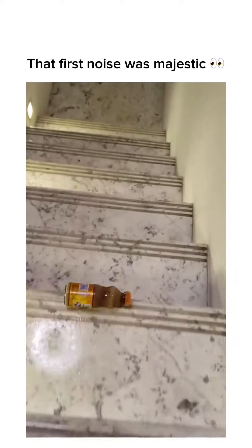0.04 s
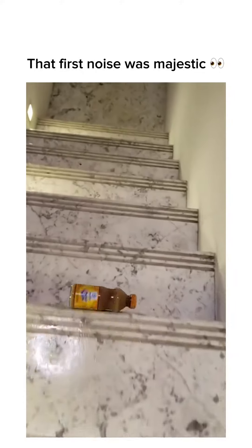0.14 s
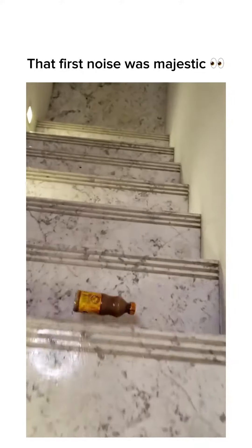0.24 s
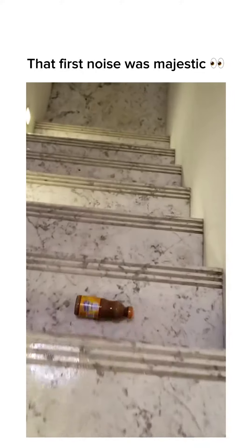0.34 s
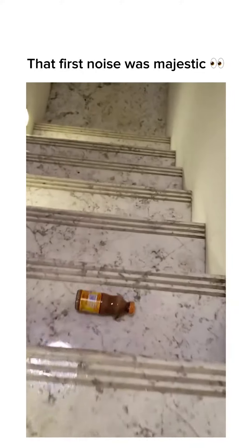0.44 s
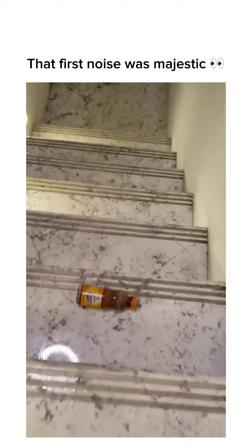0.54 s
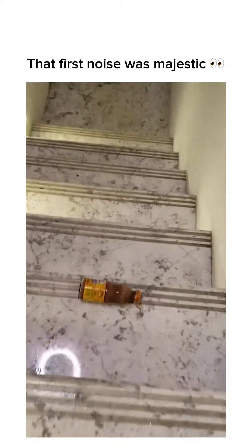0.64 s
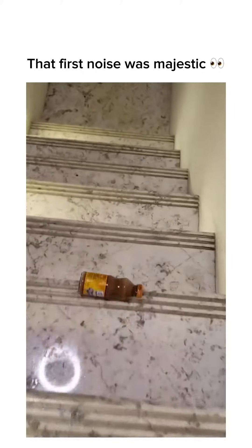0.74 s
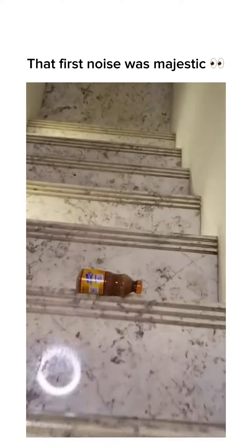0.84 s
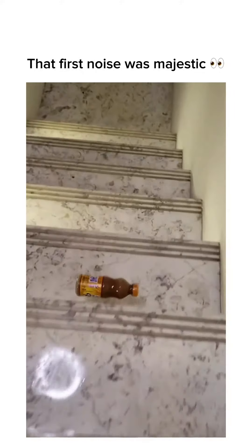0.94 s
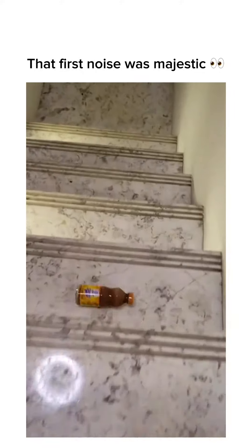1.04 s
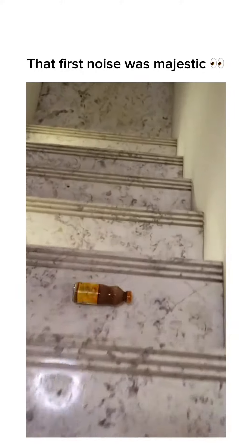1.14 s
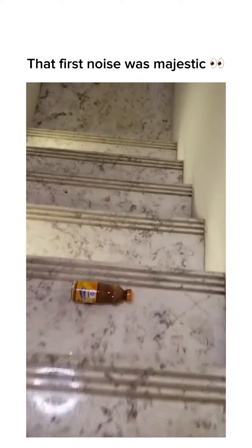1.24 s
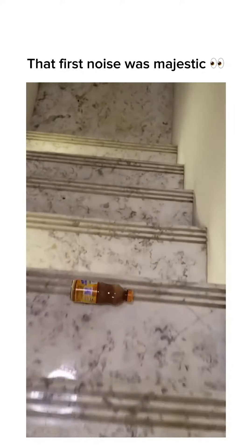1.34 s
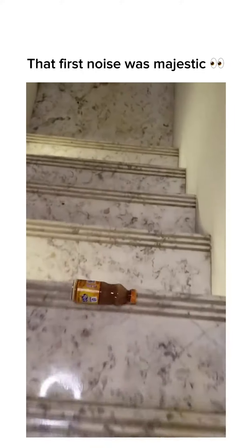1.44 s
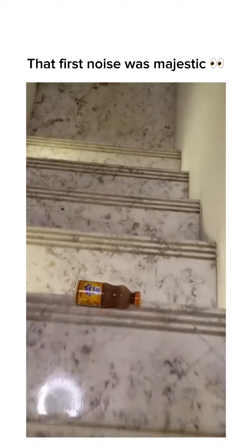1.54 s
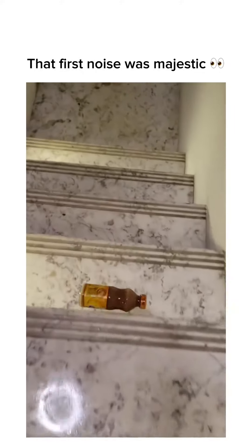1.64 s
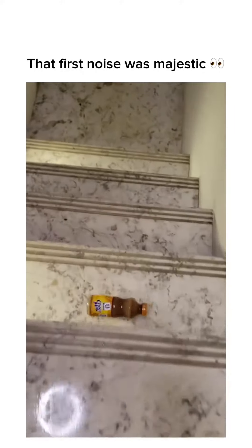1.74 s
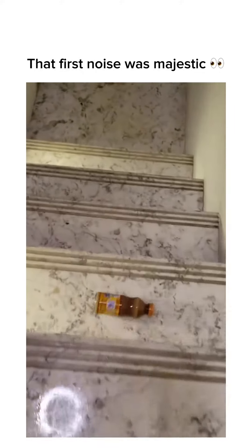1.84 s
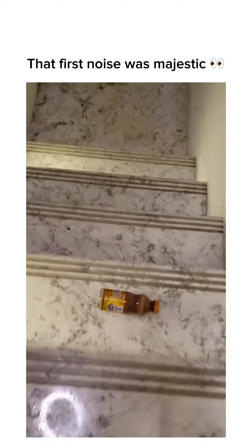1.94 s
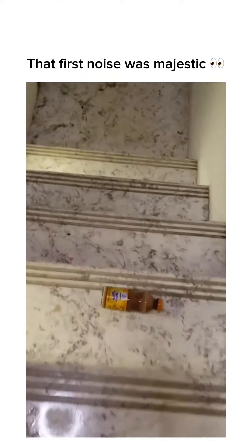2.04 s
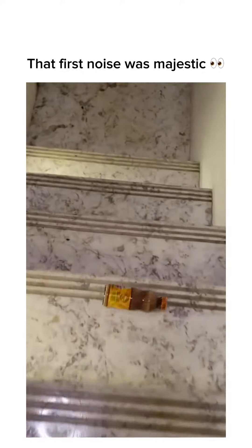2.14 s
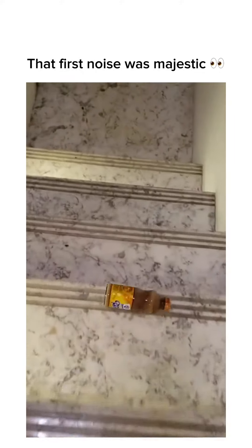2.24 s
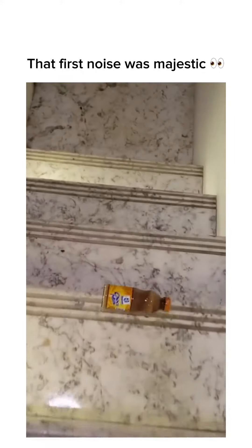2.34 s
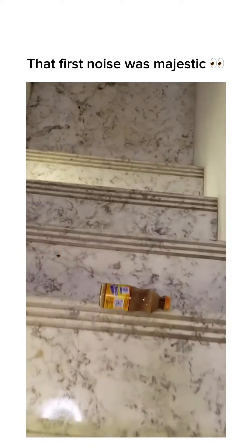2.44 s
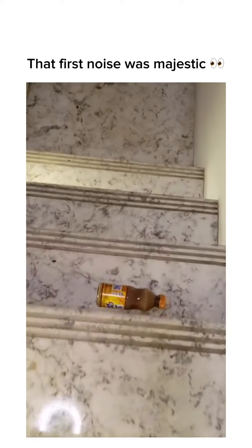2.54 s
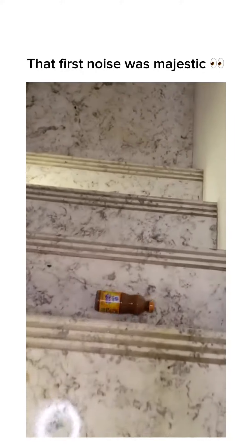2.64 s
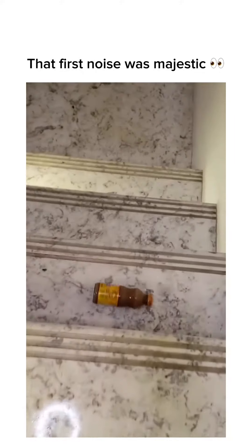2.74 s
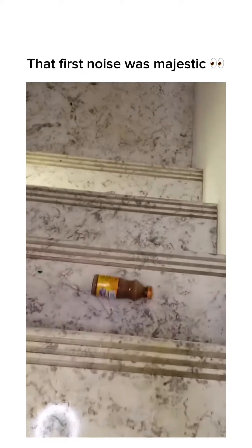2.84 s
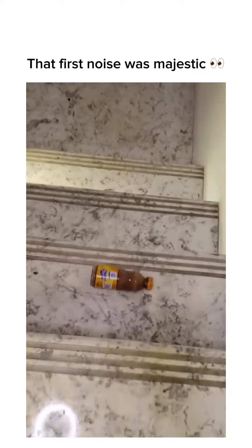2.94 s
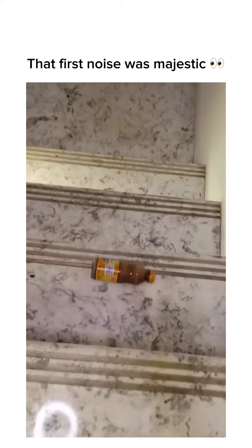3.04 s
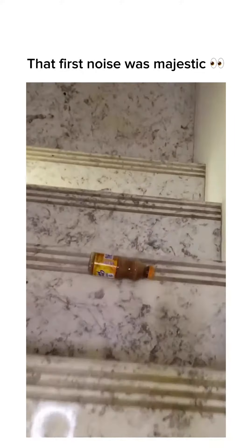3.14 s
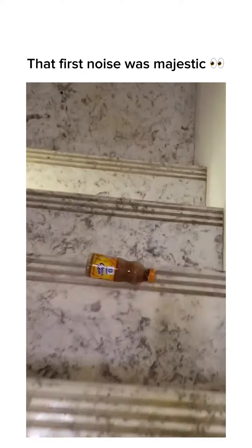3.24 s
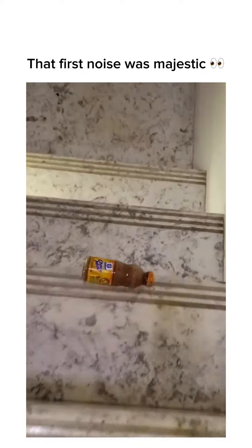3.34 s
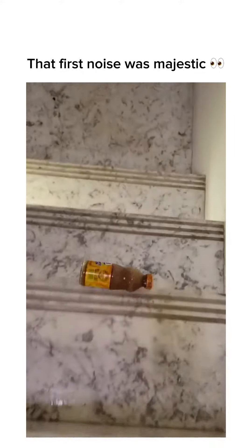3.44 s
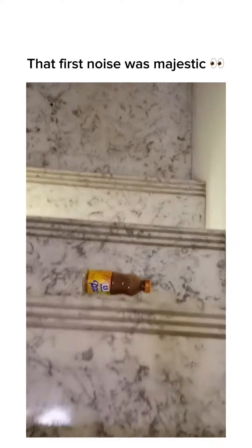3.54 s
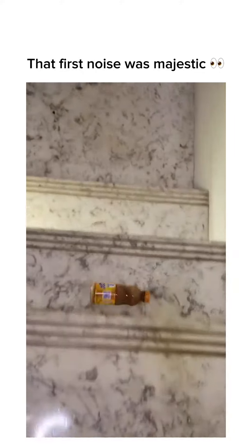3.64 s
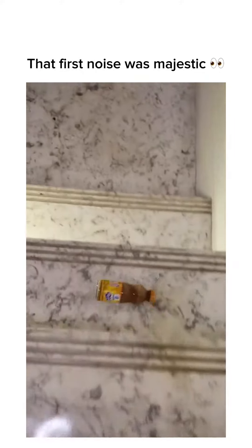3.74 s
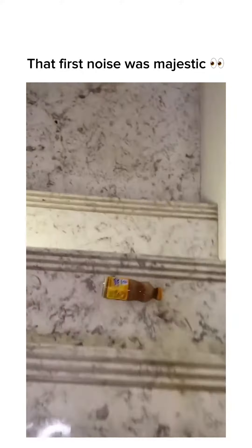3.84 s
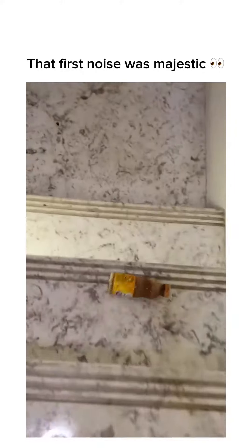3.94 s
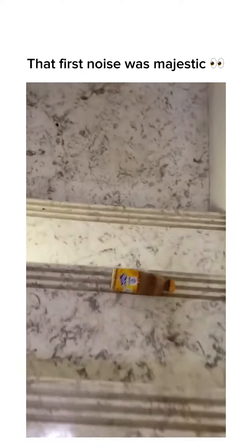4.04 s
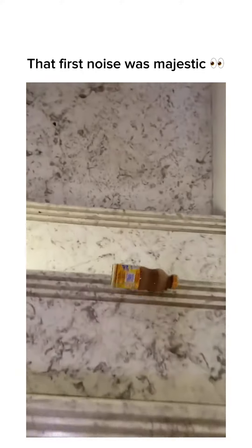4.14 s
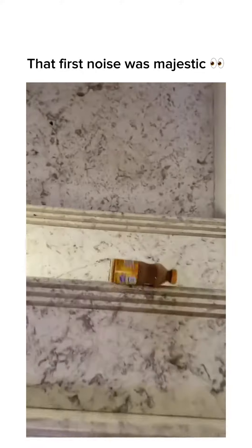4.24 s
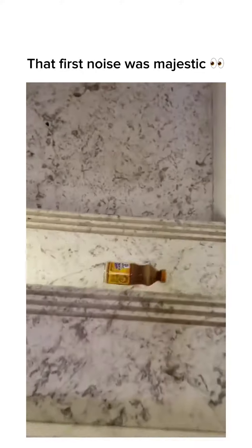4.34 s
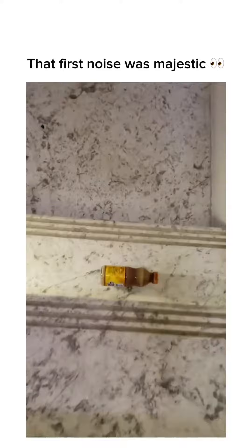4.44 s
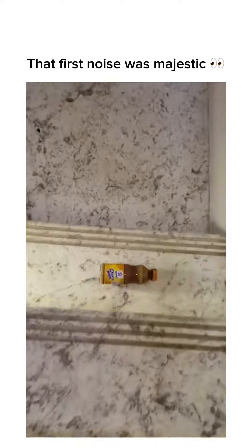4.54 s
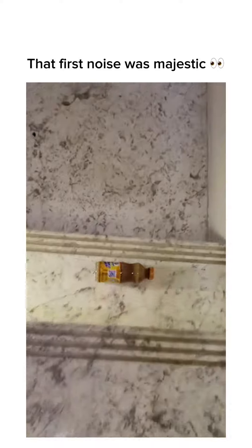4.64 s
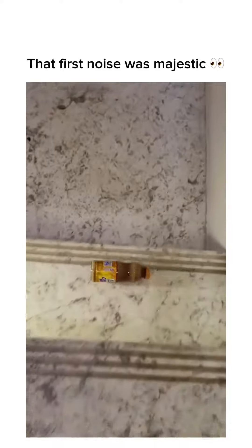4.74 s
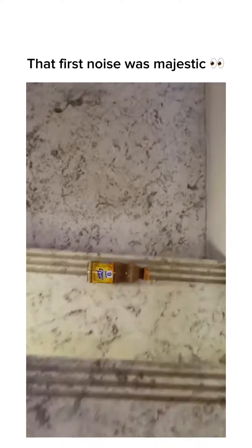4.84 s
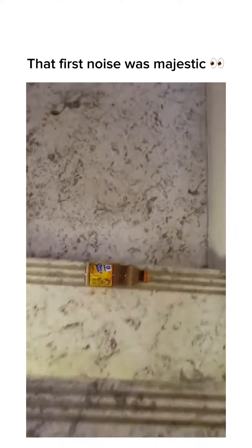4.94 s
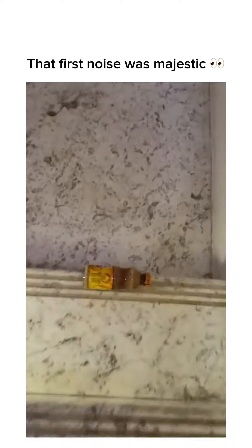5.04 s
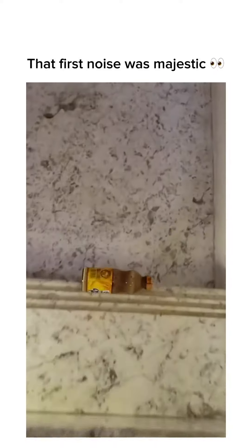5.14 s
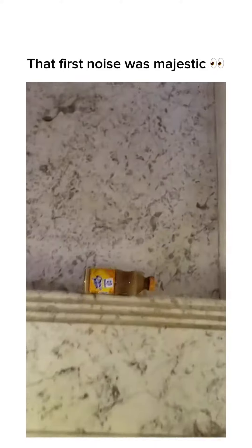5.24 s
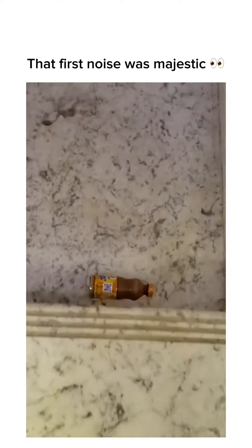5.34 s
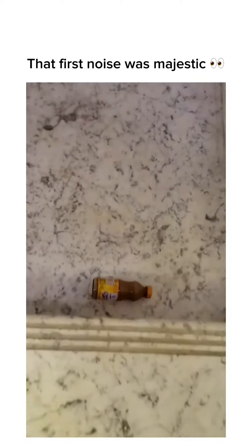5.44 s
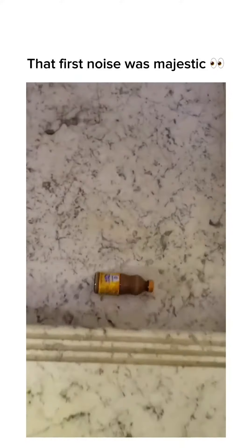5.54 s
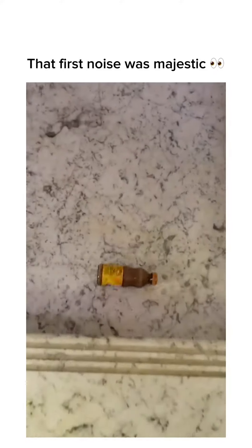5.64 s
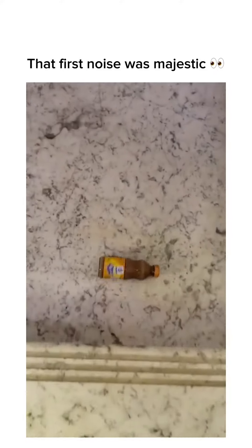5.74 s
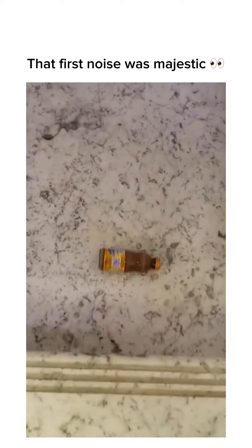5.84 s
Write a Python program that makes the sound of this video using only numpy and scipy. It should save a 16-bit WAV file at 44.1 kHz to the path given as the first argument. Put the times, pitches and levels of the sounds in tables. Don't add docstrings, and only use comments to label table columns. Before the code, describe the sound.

A small liquid-filled glass bottle tumbles down stone steps in a bare, echoing stairwell. Each landing is a bright, hard double clink with a short dull liquid ring, followed by gritty rolling and quick ticks over grooved edges. Shoes thud and scuff behind it. A handheld phone follows closely, its gain squeezing the loud hits, with low throbbing rumble underneath.

```python
import sys
import numpy as np
from scipy import signal
from scipy.io import wavfile
from scipy.ndimage import uniform_filter1d

SR = 44100
rng = np.random.default_rng(int(sys.argv[2]) if len(sys.argv) > 2 else 0)


def amp(db):
    return 10 ** (np.asarray(db, float) / 20)


def write(x):
    x = np.atleast_2d(x).T
    wavfile.write(sys.argv[1], SR, np.round(np.clip(x, -1, 1) * 32767).astype(np.int16))


N = 259744
LEAD = SR // 2


def evened(x):
    return x / np.sqrt(np.mean(x ** 2) + 1e-20)


def read(points, hz):
    f, value = np.transpose(points)
    return np.interp(np.log(hz + 1), np.log(f + 1), value)


def add(mix, s, sound):
    part = mix[..., LEAD + round(s * SR):][..., :sound.shape[-1]]
    part += sound[..., :part.shape[-1]]


def band_noise(low_hz, high_hz):
    band = signal.butter(3, [low_hz, high_hz], "band", fs=SR, output="sos")
    return evened(signal.sosfilt(band, rng.standard_normal(N)))


def pulse(points):
    log_gain = np.log(amp(read(points, abs(np.fft.fftfreq(4096, 1 / SR)))))
    click = np.fft.ifft(np.exp(np.conj(signal.hilbert(log_gain)))).real[:2048]
    return click / abs(click).max()


def mode(hz, t60, size=2048):
    t = np.arange(size) / SR
    return amp(-60 * t / t60) * np.sin(2 * np.pi * hz * t)


# frequency in Hz, level in dB.
KNOCK_COLOUR = [(50, -128), (160, -19), (400, -11), (900, -7), (1300, 1.5), (2100, 4), (3200, 0),
                (4700, -1.5), (5800, -10), (7300, -13), (9500, -23.5), (13500, -20.5), (16000, -20.5)]
KNOCK_HZ = np.geomspace(40, 20000, 900)


def struck(resonances, sizzle_db, dull_db=0):
    peaks_db = sum(db / (1 + (2 * (KNOCK_HZ - hz) / width) ** 2) for hz, width, db in resonances)
    treble_db = sizzle_db * np.clip(np.log2(KNOCK_HZ / 4500), 0, 1)
    weight_db = dull_db * np.clip(np.log2(3000 / KNOCK_HZ), 0, 1)
    return pulse(np.transpose([KNOCK_HZ, read(KNOCK_COLOUR, KNOCK_HZ) + peaks_db + treble_db + weight_db]))


def stone_thud():
    return mode(430, .04) + .4 * mode(200, .1) + .8 * mode(700, .035) + .4 * mode(950, .025)


# frequency in Hz, correlation from 0 to 1.
LIKENESS = [(60, 0.86), (150, 0.76), (380, 1), (950, 0.26), (2380, 0.29), (5980, 0.1), (15000, 0.11)]


def noise(size, shape_db):
    hz = np.fft.rfftfreq(512, 1 / SR)[:, None]
    t = np.arange(size // 128 + 5) * 128 / SR
    a, b, c, d = rng.standard_normal((len(t), len(hz), 4)).T
    same = np.clip(read(LIKENESS, hz), -1, 1)
    left = a + 1j * b
    right = same * left + np.sqrt(1 - same ** 2) * (c + 1j * d)
    z = np.array([left, right]) * amp(shape_db(hz, t))
    return signal.istft(z, nperseg=512, noverlap=384)[1][:, :size]


# frequency in Hz, t60 in seconds.
WELL_T60 = [(200, 1.21), (600, 1.154), (1500, 1.128), (3800, 0.89), (7000, 0.75), (11000, 0.6),
            (16000, 0.43)]


def stairwell(x):
    streaks = evened(uniform_filter1d(rng.standard_normal((SR * 5 // 512 + 5, 257)), size=28, axis=0)).T
    tail = noise(SR * 5 // 4, lambda hz, t: -60 * t / read(WELL_T60, hz) + 3.5 * streaks)
    t = np.arange(tail.shape[1]) / SR
    echoes = rng.random(len(t)) < 900 / SR
    early = echoes * 2.7 * np.exp(-t / 0.3) * (t > .013)
    onset = np.clip((t - .002) / 0.18, 0, 1) ** 0.12
    tail *= onset * (np.clip(t / 0.03, .1, 1) ** 0.76 + early)
    return signal.fftconvolve(x[None], tail / np.linalg.norm(tail[0]), axes=1)


def since_landing():
    since = np.arange(N) / SR - np.array([row[0] for row in LANDINGS])[:, None]
    return np.where(since > 0, since, 9).min(0)


def humps(times, peaks_db, rise_db_per_s, fall_db_per_s, floor_db):
    after = np.arange(N) / SR - np.array(times)[:, None]
    slope = np.where(after < 0, rise_db_per_s, -fall_db_per_s)
    return np.maximum((np.array(peaks_db)[:, None] + slope * after).max(0), floor_db)


# middle in seconds, level in dB, pitch in Hz, length in seconds.
THROB_SWELLS = [(.085, -25, 51.7, 0.15), (0.242, -28.5, 52.8, 0.19), (0.51, -26, 56.3, 0.12),
                (0.658, -26.5, 57.9, 0.15), (0.793, -24.5, 58.3, 0.16), (0.951, -25.5, 57.4, 0.18),
                (1.046, -24.5, 54.8, 0.055), (1.24, -30, 52.9, 0.15), (1.394, -36, 54, 0.13),
                (1.52, -31.5, 51.8, 0.19), (1.654, -28, 53.6, .15), (1.79, -26, 59.3, 0.16),
                (1.944, -26, 56.9, 0.13), (2.112, -33, 59.7, 0.13), (2.237, -31, 56.3, 0.1),
                (2.396, -31.5, 59.5, 0.14), (2.538, -32, 52.4, 0.18), (2.667, -23, 56.1, 0.046),
                (2.956, -37, 55.2, 0.14), (3.119, -37, 52.05, 0.26), (3.287, -34, 54.7, .16),
                (3.42, -35, 55.6, .16), (3.53, -34.5, 62.2, .12), (4.196, -40, 61.3, 0.12),
                (5.26, -42, 52.5, .2), (5.756, -40, 53, .3)]
# time in seconds, level in dB.
RUMBLE_LEVEL = [(0, -34.5), (1, -46.5), (2.6, -40), (3.5, -39.5), (4.3, -40), (4.8, -46), (5.3, -42),
                (5.89, -55)]


def throb():
    t = np.arange(N) / SR
    middle, db, hz, length = np.transpose(THROB_SWELLS)
    tone = np.sqrt(2) * np.sin(2 * np.pi * np.cumsum(np.interp(t, middle, hz)) / SR)
    swell = np.cos(np.pi * np.clip((t - middle[:, None]) / length[:, None], -.5, .5))
    level = (amp(db)[:, None] * swell).max(0)
    rumble = band_noise(48, 105) + amp(-7) * band_noise(120, 165)
    rumble = rumble * amp(np.interp(t, *np.transpose(RUMBLE_LEVEL)))
    duck_db, duck_s = -40, 0.23
    duck = amp(duck_db * np.clip(1 - since_landing() / duck_s, 0, 1) ** 1.5)
    return (tone * level + rumble) * uniform_filter1d(duck, size=300) * amp([[-2.5], [2.2]])


# time in seconds, level in dB, extra t60 in seconds.
FAR_HEEL = (5.088, 18, 0.73)
# frequency in Hz, width in Hz, level in dB.
HEEL_RESONANCES = [(700, 400, 13), (1340, 350, 16), (2050, 300, 12), (4000, 2500, -8)]


def far_heel():
    s, db, t60 = FAR_HEEL
    heel = stairwell(struck(HEEL_RESONANCES, -10))[:, SR // 70:]
    heel[:, :2048] += amp(-9) * struck(HEEL_RESONANCES, -19)
    return s, heel * amp(db - 24 - 60 * np.arange(heel.shape[1]) / SR / t60)


# time in seconds, thud in dB, grit in dB, sole pitch in Hz.
SHOE_STEPS = [
    (0.0564, -35, -63, 504),
    (0.8064, -19.5, -25, 400),
    (1.528, -20.5, -39, 601),
    (2.2654, -36, -16.5, 590),
    (4.166, -33, -56, 487),
    (4.9447, -28, -31, 680),
]


def shoes():
    near, thrown, t = np.zeros(LEAD + N), np.zeros(LEAD + N), np.arange(330) / SR
    grit = pulse([(5000, -3.0), (9000, 2.5), (11000, -0.5), (13500, 1), (16500, 4.0)])
    thud = stone_thud()
    for s, thud_db, grit_db, sole_hz in SHOE_STEPS:
        burst = np.convolve(rng.standard_normal(330) * amp(-60 * t / 0.22), grit)[:2048]
        shoe = amp(thud_db) * (thud + 1.1 * mode(sole_hz, 0.047)) + amp(grit_db) * burst
        add(near, s, shoe)
        add(thrown, s, amp(-11.5) * shoe)
    return near, thrown


# loudest grind in seconds, its dB, loudest grit in seconds, its dB.
STEP_ROLLS = [
    (.01, -29, 0.012, -10),
    (.8, -30.5, 0.73, -4.5),
    (1.47, -29, 1.42, -2),
    (2.27, -33, 2.24, -14),
    (3.25, -35, 3.25, -19.5),
    (3.5, -45, 3.45, -31),
    (4.151, -32.5, 4.16, -12.5),
    (4.93, -36.5, 4.1, -35),
    (5.02, -34, 5.11, -26.5),
]
# frequency in Hz, level in dB.
GRIND_COLOUR = [(130, -106), (200, 1), (400, -5), (700, 4), (1100, 0.5), (2500, -19), (6000, -22.5)]
# frequency in Hz, level in dB.
SCUFF_COLOUR = [(4000, 2), (8500, -8), (10500, -0.5), (12000, -14), (13400, 9), (15000, -2), (16200, -9)]
# time in seconds, level in dB.
SOLE_SCUFFS = [(.3, -33.5), (1.04, -28.5), (1.468, -35), (1.78, -35), (2.3, -37), (2.52, -36),
               (3.05, -35.5), (3.4, -40.5), (4.07, -43), (4.36, -39), (4.76, -35), (4.95, -36.5),
               (5.101, -42), (5.28, -42)]


def rolling():
    grind_s, grind_db, grit_s, grit_db = np.transpose(STEP_ROLLS)
    scuff_s, scuff_db = np.transpose(SOLE_SCUFFS)
    grind_db = 3 + humps(grind_s, grind_db, rise_db_per_s=57, fall_db_per_s=64, floor_db=-54)
    scuff_db = -1 + humps(scuff_s, scuff_db, rise_db_per_s=100, fall_db_per_s=103, floor_db=-51.5)
    grit_db = -9 + humps(grit_s, grit_db, rise_db_per_s=110, fall_db_per_s=170, floor_db=-50.5)
    airborne_db = -25 * np.clip(1 - since_landing() / 0.125, 0, 1)
    snap_db = 3 * np.minimum(rng.exponential(1, N), 4)
    snaps = (rng.random((2, N)) < 1100 / SR) * amp(snap_db)
    snaps = snaps + 0.21 * snaps[::-1]
    grind = noise(N, lambda hz, t: read(GRIND_COLOUR, hz))
    scuff = noise(N, lambda hz, t: read(SCUFF_COLOUR, hz))
    grit = signal.oaconvolve(snaps, struck([(2200, 1900, 1)], -4.5)[None], axes=1)[:, :N]
    layers = (grind, grind_db), (scuff, scuff_db), (grit, grit_db)
    return sum(evened(x) * amp(db + airborne_db) for x, db in layers)


# time in seconds, peak in dB, pitch in Hz, echo in dB.
BOTTLE_TICKS = [(0.0131, -6, 2630, -22), (0.0567, -11, 1730, 12), (0.66, -7, 1700, -8),
                (0.729, -1, 1710, -10), (0.78, -10, 2340, 1), (0.8072, -11, 2320, -11),
                (1.3958, -1.5, 2200, 2), (1.428, -5, 2600, -3), (1.527, -11, 1890, -7),
                (1.5366, -7.5, 3040, -5), (2.1924, -8.5, 2440, -5), (2.2092, -5, 2180, -1),
                (2.361, -19.5, 2365, 21), (3.144, -13.5, 1940, 12.5), (3.2353, -12, 2324, 10),
                (3.323, -13.5, 2780, 12), (4.024, -5, 2590, -8), (4.032, -9.5, 1670, 12),
                (4.089, -8.5, 1870, 1), (4.1214, -6, 2785, 9), (4.159, -13, 1680, 2),
                (4.169, -15, 1820, -4), (4.8388, -18, 2200, 12), (4.881, -10.5, 1900, -3)]


def ticks():
    near, thrown = np.zeros(LEAD + N), np.zeros(LEAD + N)
    thud = stone_thud()
    for s, db, hz, echo_db in BOTTLE_TICKS:
        knock = amp(db + 2.5) * (struck([(hz, 1100, 13)], -21) + amp(-24.5) * thud)
        add(near, s, knock)
        add(thrown, s, amp(echo_db - 13) * knock)
    return near, thrown


# time in seconds, blow in dB, second end's delay in ms, base pitch in Hz, shoulder in dB.
LANDINGS = [
    (-.42, 17.5, 8.9, 2400, -1),
    (.343, 15, 3.95, 2570, 2),
    (1.060, 17.5, 5, 2160, -8),
    (1.8034, 10, 7, 1820, 10),
    (2.688, 13.5, 6.3, 2133, -3),
    (3.6692, 11, 7.6, 1760, 1),
    (4.438, 11.5, 5.8, 1990, 6),
    (5.436, 12, 8.4, 3850, -6),
]
# ring in Hz, its dB, wall modes in dB, sizzle in dB, treble tone hold in
# seconds.
LANDING_RINGS = [(3870, 3, -1, 16, .6), (3825, 0.5, 0, 12, 0.39), (4350, -6, 6, 15, 0.24),
                 (3920, -2, 1.5, 10, 0.16), (4050, -2, 4.5, 11.5, 0), (3850, -1.5, 4.5, 10, 0.096),
                 (3970, -0.5, 5, 10, 0.054), (3850, -7.5, 13.5, 13, .12)]
# frequency in Hz, width in Hz, share of the landing's wall-mode dB.
GLASS_WALL = [(3790, 200, .9), (3960, 220, .6), (4420, 260, .8), (2550, 200, .3), (4950, 200, .3)]
# frequency in Hz, level in dB, t60 in seconds.
LIQUID_BODY = [(1145, 2.5, 0.28), (761, 0, 0.19), (571.3, -2, 0.22), (373.2, -10.5, 0.46),
               (278.6, -22, 0.46)]


def landing(s, blow_db, apart_ms, base_hz, shoulder_db, ring_hz, ring_db, wall_db, sizzle_db, hold):
    body = sum(amp(-39 - blow_db + db) * mode(hz, t60, size=SR // 2) for hz, db, t60 in LIQUID_BODY)
    wall = [(hz, width, share * wall_db) for hz, width, share in GLASS_WALL]
    lead_in = round(4.1 * SR / 1000)
    later = round(apart_ms * SR / 1000)
    thrown, direct = body.copy(), .5 * body
    thrown[:2048] += struck(wall + [(ring_hz, 600, ring_db + 9)], sizzle_db, dull_db=-5)
    faint_rise = 0.049 * rng.standard_normal(400)[:lead_in] * np.linspace(0, 1, lead_in)
    base = struck(wall[1:3] + [(base_hz, 900, 8)], sizzle_db - 20)
    direct[:2048] += np.convolve(np.append(faint_rise, 1), base)[:2048]
    direct[lead_in:][:2048] += amp(-27.5) * mode(375, 0.02)
    shoulder = struck([(ring_hz, 800, ring_db + 12)], sizzle_db - 12)
    direct[lead_in + later:][:2048] += amp(shoulder_db) * shoulder
    wet = np.pad(amp(21.5) * stairwell(thrown), ((0, 0), (lead_in, 0)))
    wet[:, :len(direct)] += direct
    return s - lead_in / SR, amp(blow_db) * wet


def scene():
    shoes_near, shoes_thrown = shoes()
    ticks_near, ticks_thrown = ticks()
    mix = shoes_near + ticks_near + stairwell(shoes_thrown + ticks_thrown)[:, :LEAD + N]
    add(mix, *far_heel())
    for blow, ring in zip(LANDINGS, LANDING_RINGS):
        add(mix, *landing(*blow, *ring))
    return mix[:, LEAD:] + rolling() + throb()


# frequency in Hz, depth in dB.
SILENCE_DEPTH = [(4500, 50), (5400, 26), (7000, 35), (9300, 30.5), (12000, 33.5), (14000, 38), (15300, 33),
                 (16000, 20)]


def drop_bands(hz, z):
    power = (abs(z) ** 2).mean(0)
    band, block = (hz // 345).astype(int), np.arange(z.shape[2]) // 4
    cells = np.zeros((band.max() + 1, block.max() + 1))
    np.add.at(cells, (band[:, None], block), power)
    under_db = 10 * np.log10(cells[2:].sum(0) / (cells + 1e-18))
    luck_db = 5.5 * evened(uniform_filter1d(rng.standard_normal(cells.shape), size=6))
    allowed_db = read(SILENCE_DEPTH, (np.arange(len(cells)) + .5) * 345)[:, None]
    return z * (under_db + luck_db < allowed_db)[band][:, block]


# start in seconds, end in seconds, tone in Hz.
TONE_SPELLS = [
    (.04, .82, 14298),
    (1.2, 2.3, 14298),
    (2.72, 3.6, 14298),
    (1.55, 2.1, 11542),
    (3.35, 4.42, 11542),
    (3.72, 4.4, 10853),
    (4.5, 4.8, 14298),
    (5.5, 5.7, 14298),
]
# tone in Hz, delay in seconds, share of the landing's hold.
LANDING_TONES = [(12231, .06, 1), (12920, .05, .7)]


def swap_tones(x):
    hz, t, z = signal.stft(x, SR, nperseg=512)
    time, tones = np.arange(N) / SR, np.zeros_like(x)
    brief = []
    for blow, ring in zip(LANDINGS, LANDING_RINGS):
        for tone_hz, after, share in LANDING_TONES:
            start = blow[0] + after
            brief.append((start, start + share * ring[-1], tone_hz))
    for start, end, tone_hz in TONE_SPELLS + brief:
        inside = (abs(hz - tone_hz) < 330)[:, None] & (t > start) & (t < end)
        level = np.sqrt(uniform_filter1d((abs(z * inside) ** 2).sum(1), size=7).clip(0))
        level = np.array([np.interp(time, t, channel) for channel in level])
        tones += amp(0.5) * level * np.sin(2 * np.pi * tone_hz * time)
        z = z * ~inside
    return signal.istft(drop_bands(hz, z), SR, nperseg=512)[1][:, :N] + tones


def roll_off(x):
    return signal.sosfilt(signal.butter(12, 16500, fs=SR, output="sos"), x)


def record(dry):
    bass = signal.sosfiltfilt(signal.butter(4, 120, fs=SR, output="sos"), dry)
    upper = dry - bass
    power_db = 10 * np.log10(abs(uniform_filter1d((upper ** 2).mean(0), size=350)) + 1e-12)
    fall = np.arange(N) * 250.0 / SR
    peak_db = np.maximum.accumulate(power_db + fall) - fall
    over_db = np.maximum(peak_db + 23.0, 0)
    held = upper / amp(0.47 * uniform_filter1d(over_db, size=200))
    held = 0.89 * np.tanh(held / 1.056)
    held = bass + signal.sosfilt(signal.butter(3, 125, "high", fs=SR, output="sos"), held)
    band_limit = signal.firwin(511, 16150, window=("kaiser", 9), fs=SR)
    held = signal.oaconvolve(held, band_limit[None], "same")
    return roll_off(swap_tones(held))


dry = scene()
out = record(dry)
write(out)
```